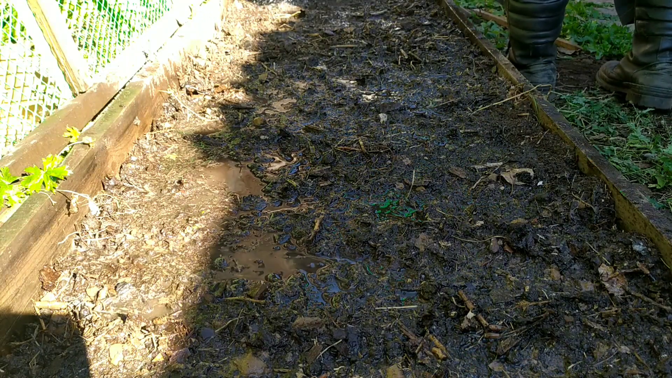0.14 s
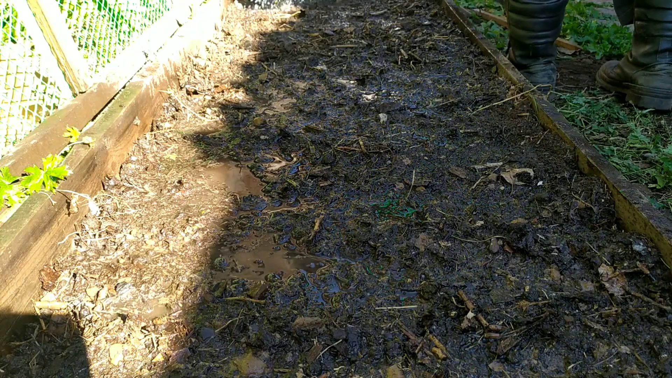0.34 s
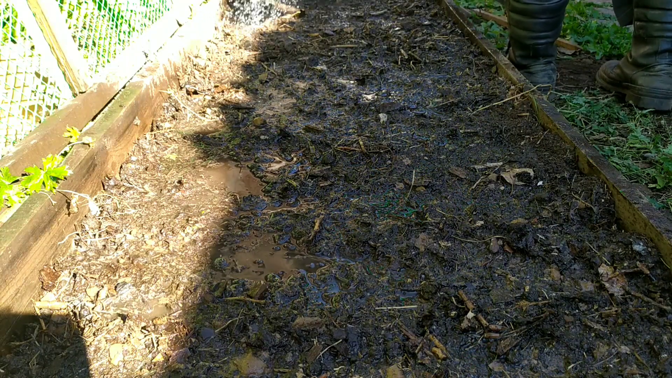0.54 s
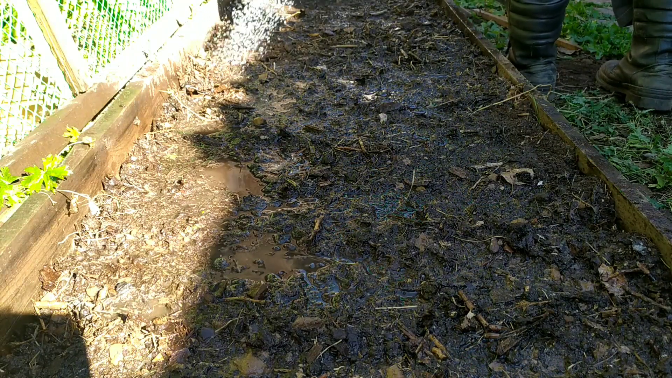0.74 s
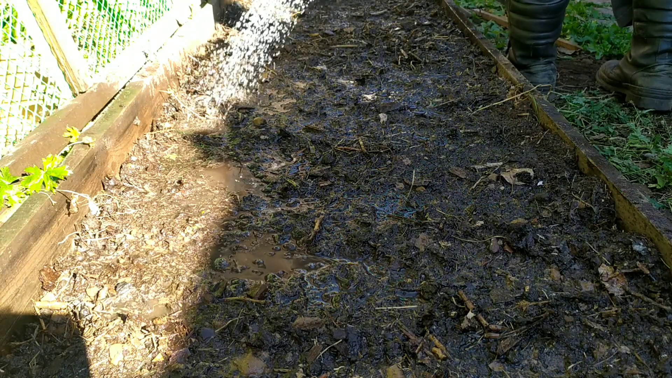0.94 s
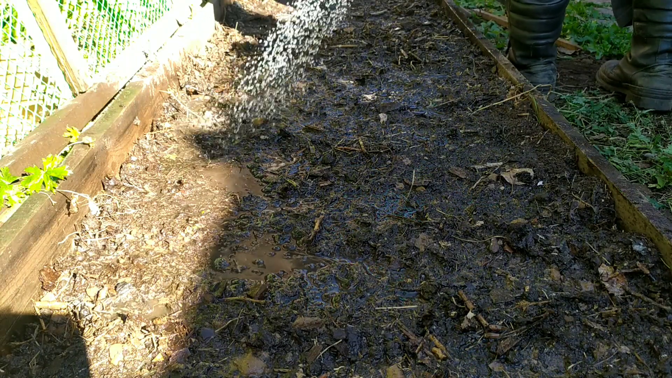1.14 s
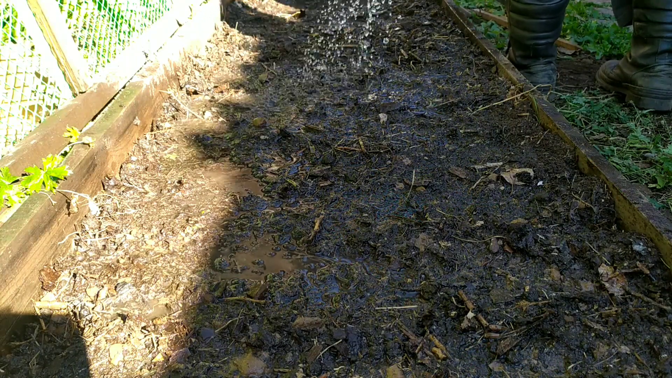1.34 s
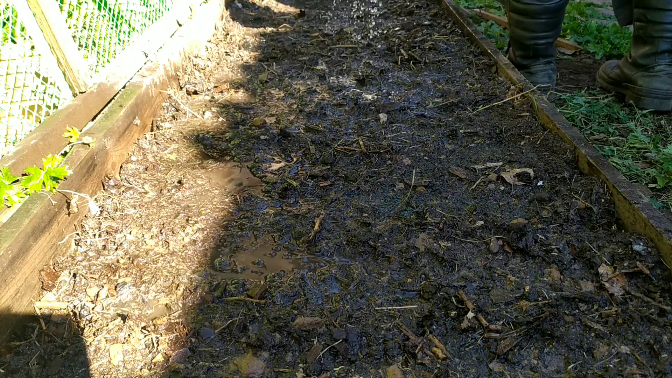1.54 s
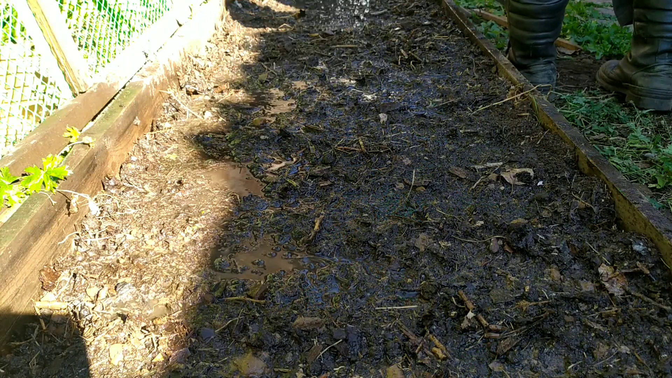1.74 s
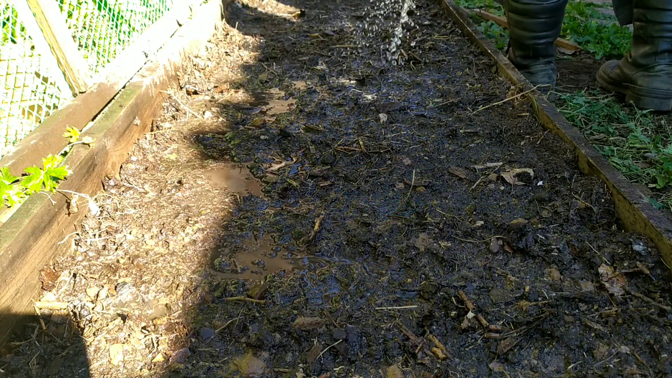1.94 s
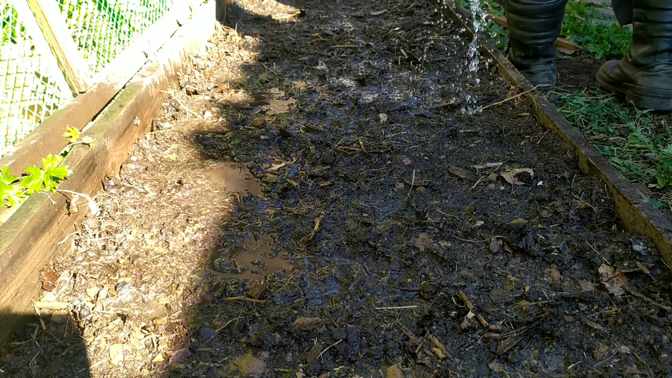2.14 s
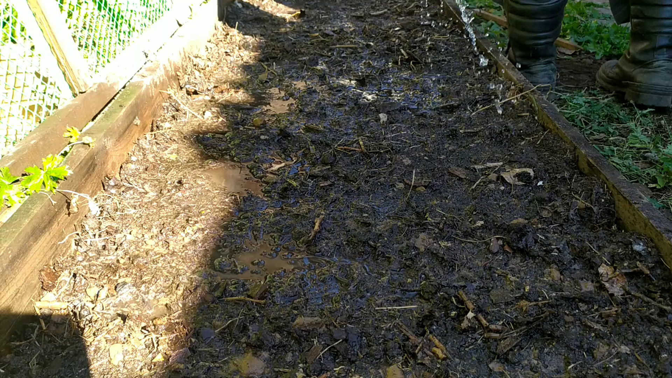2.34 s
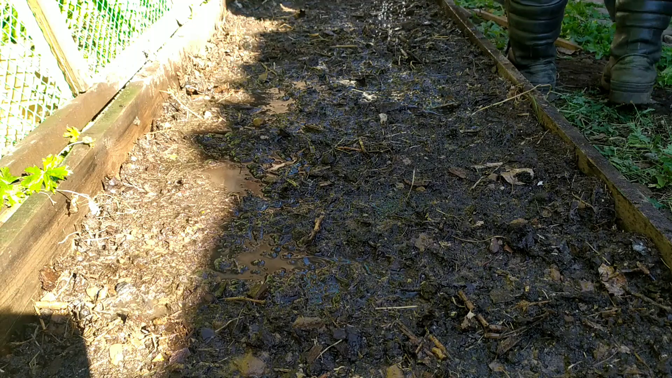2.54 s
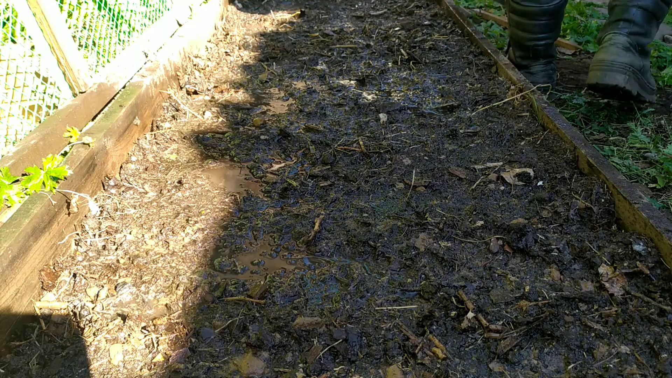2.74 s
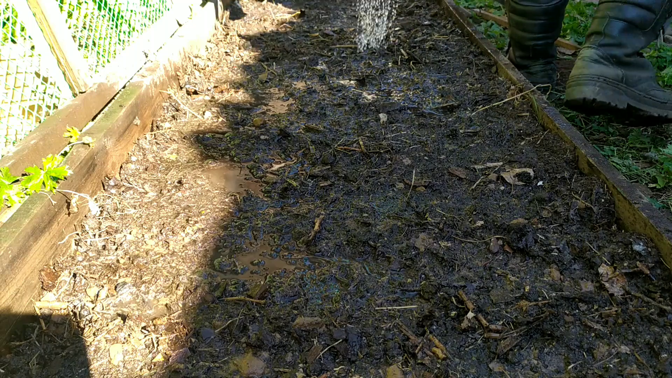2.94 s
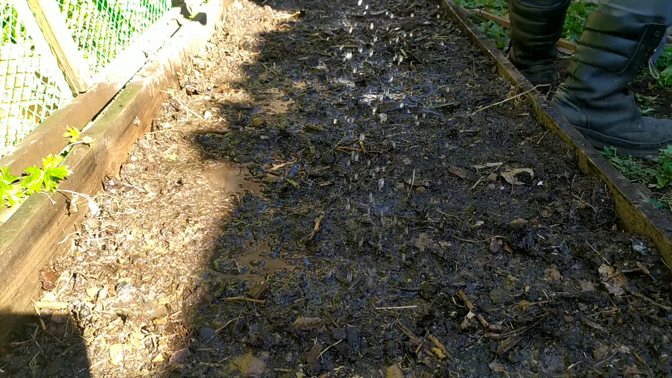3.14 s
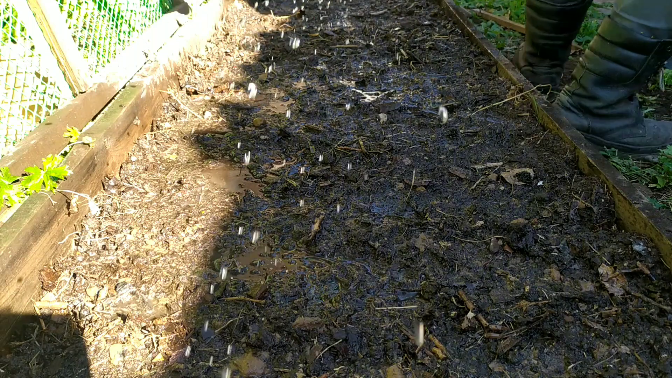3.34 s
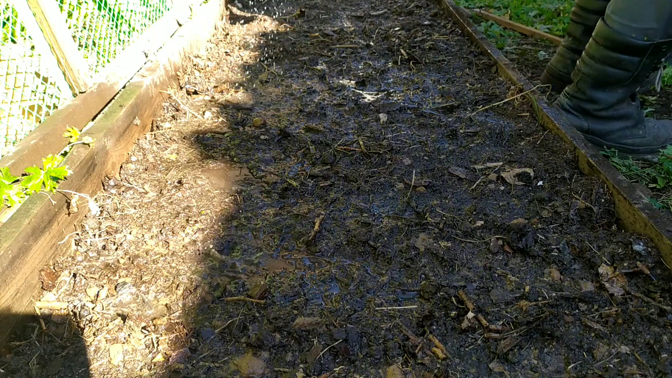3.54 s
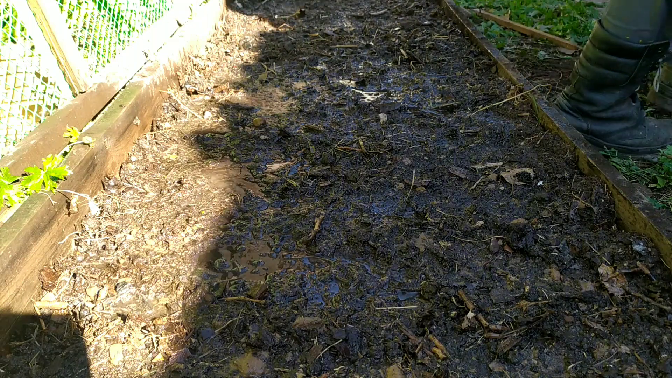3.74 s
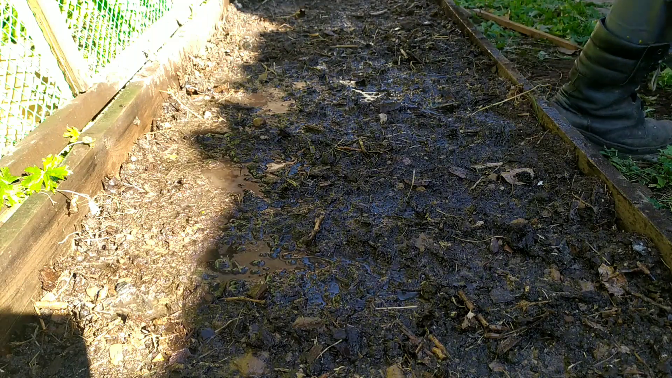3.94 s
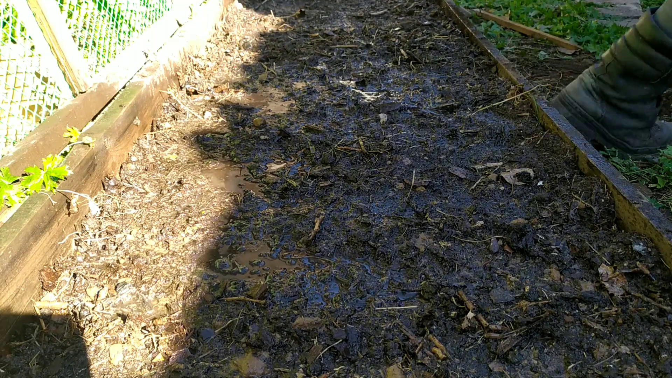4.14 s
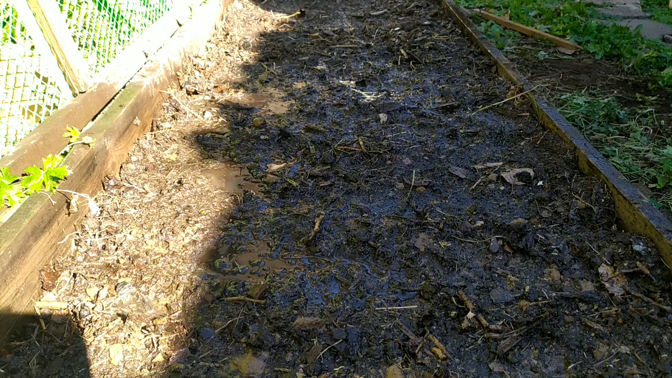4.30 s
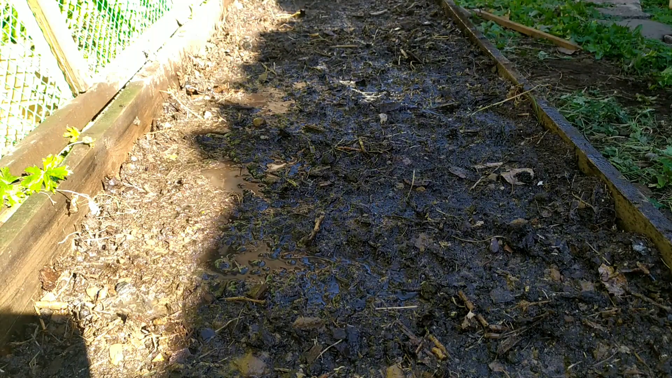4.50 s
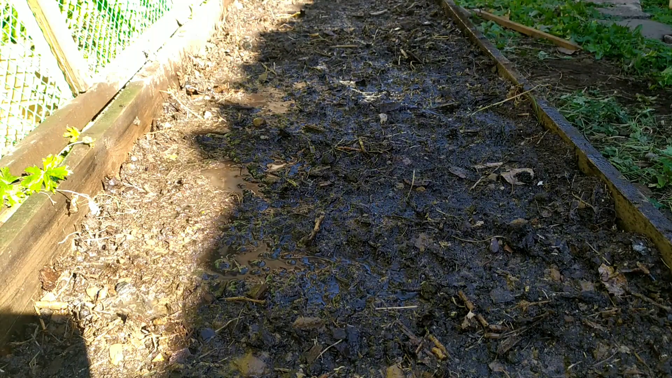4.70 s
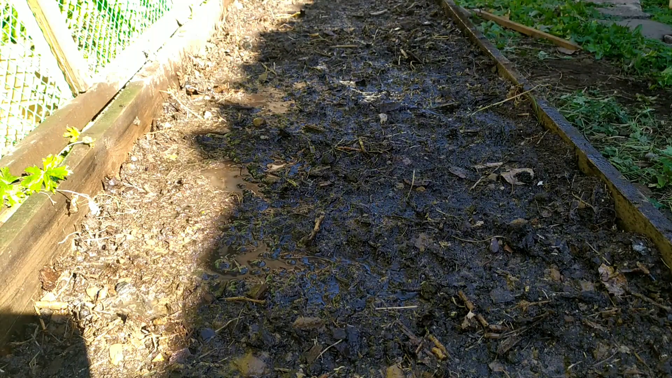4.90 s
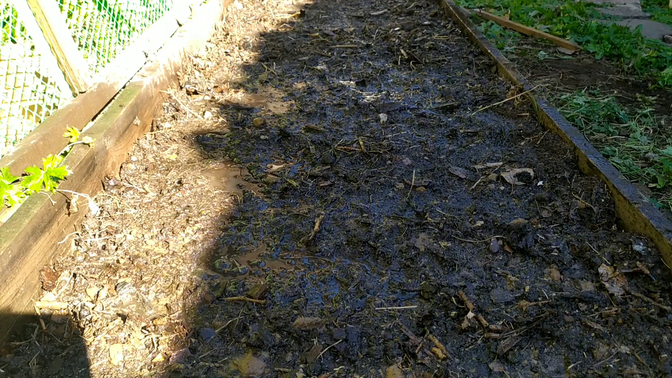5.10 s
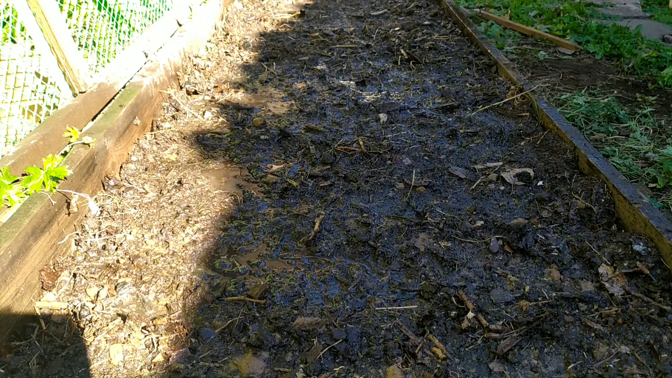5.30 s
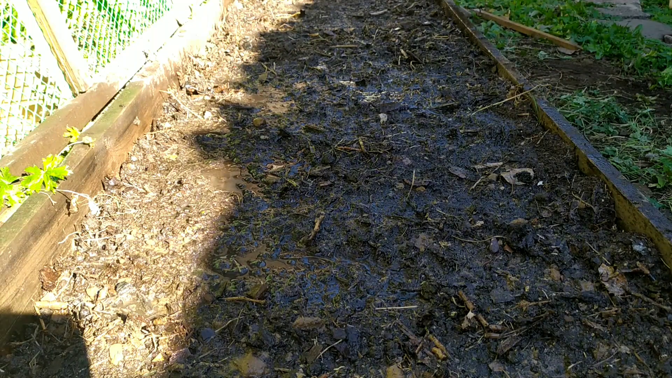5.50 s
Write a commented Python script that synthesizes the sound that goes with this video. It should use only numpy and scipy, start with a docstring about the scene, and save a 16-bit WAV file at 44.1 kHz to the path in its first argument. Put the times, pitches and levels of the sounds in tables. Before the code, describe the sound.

Fine water spray hisses and ticks over mud and leaves, stops with a small gurgle, then grass crunches and a hollow can knocks.

```python
"""A watering can sprinkles wet garden soil: damped grains make the hiss and patter of fine drops.
Fat drops tick on dead leaves, slap on mud or plip into puddles, bubbles whose pitch climbs.
The pour thins to a dribble as boots start to brush the grass, in bursts of crackle; a low hum wavers.
A last shake, and the spout gurgles on ringing modes. Boots rustle off, over a plank for a moment, and
the hollow can knocks on its own modes as it is put down. Quiet air and far-off whistles lie behind."""
import sys
import numpy as np
from scipy import signal
from scipy.fft import rfft, irfft
from scipy.io import wavfile
from scipy.ndimage import uniform_filter1d, map_coordinates

SR = 44100
rng = np.random.default_rng(int(sys.argv[2]) if len(sys.argv) > 2 else 0)


def wav_record(signal):
    """Record a signal, one row per channel, as 16-bit PCM in the file named by sys.argv[1]."""
    frames = np.transpose(np.atleast_2d(signal))
    bounded = np.clip(frames, -1, 1)
    # unit amplitude maps onto the largest positive 16-bit level
    quanta = np.round(bounded * 32767).astype(np.int16)
    wavfile.write(sys.argv[1], SR, quanta)


N = 249606
T = np.arange(N) / SR
HZ = np.fft.rfftfreq(N, 1 / SR)
REFERENCE_FLOW_DB = -40  # the strong flow at which the water layers' levels are set

# The pour, two full sweeps, a dribble and a last shake: start_s, flow_db, brightness_db_per_octave
POUR = [(0, -47, 6), (.23, -39, 2.5), (.36, -39.5, 2.5), (.44, -42.5, 2), (.56, -43, 6.5), (.69, -45.5, 4),
        (0.785, -51, 7), (0.9, -42.5, 3), (1.08, -41, 7), (1.3, -41, 2), (1.44, -45, 4.5),
        (1.66, -54.5, 1.5), (1.881, -49, 1.5), (2.032, -46.5, -5), (2.25, -54, 4.5), (2.57, -54.5, 0.5),
        (2.95, -56.5, 4.5), (3.037, -44, 3.5), (3.14, -52.5, 7.5), (3.35, -50, 7.5), (3.55, -49.5, 3),
        (3.61, -59.5, 1)]
# Spectrum of fine drops, also lent to springing stems: frequency_hz, level_db
HISS = [(1500, -36), (2500, -8.5), (3600, -5.5), (5200, -4.5), (7200, -2.5), (10000, -7), (13000, -9),
        (16000, -14)]


def amp(db):
    """Decibels to gain."""
    return 10 ** (np.asarray(db) / 20)


def unit(x):
    """Scales to rms 1."""
    return x / np.sqrt(np.mean(x ** 2) + 1e-20)


def read(points, hz):
    """Reads a spectrum on a log-frequency axis."""
    f, value = np.transpose(points)
    return np.interp(np.log(hz + 1), np.log(f + 1), value)


def colour(x, points):
    """Gives x a spectrum that falls away below its lowest point; rms 1."""
    low_cut = 1 / np.sqrt(1 + (points[0][0] / 2 / (HZ + 1)) ** 4)
    return unit(irfft(rfft(x) * amp(read(points, HZ)) * low_cut, N))


def add(mix, s, sound):
    """Adds a sound into the mix at time s."""
    part = mix[..., max(round(s * SR), 0):][..., :sound.shape[-1]]
    part += sound[..., :part.shape[-1]]


def held(start, end, fade_s):
    """Gain that fades in from start, holds, and fades out by end."""
    return np.clip(np.minimum(T - start, end - T) / fade_s, 0, 1)


def follow(rows, axis=1):
    """One column of a control curve, at every sample."""
    rows = np.array(rows)
    return np.interp(T, rows[:, 0], rows[:, axis])


def flutter(depth_db, per_s):
    """Random quick swings of gain."""
    knots = np.arange(0, T[-1] + 1, 1 / per_s)
    swings = rng.standard_normal(len(knots))
    return amp(depth_db * np.interp(T, knots, swings))


def pair(x, lead):
    """One sound at two microphones, the left one ahead by lead samples."""
    return np.array([map_coordinates(x, [np.arange(N) + side * lead], order=3) for side in (.5, -.5)])


def diffuse():
    """Noise from all around, its likeness at the two microphones strongest in the bass."""
    # Likeness of the two sides: frequency_hz, correlation (0 to 1)
    likeness = [(30, 0.63), (250, 0.77), (600, 0.71), (1200, 0.15), (3000, 0), (16000, 0.02)]
    a, b = rfft(rng.standard_normal((2, N)))
    same = np.clip(read(likeness, HZ), -1, 1)
    return irfft(np.array([a, same * a + np.sqrt(1 - same ** 2) * b]), N)


def band_noise(hz, ratio, size=4000):
    """Noise around hz for both sides, with gentle skirts."""
    band = signal.butter(2, [hz / ratio, min(hz * ratio, SR * .45)], "band", fs=SR, output="sos")
    return unit(signal.sosfilt(band, rng.standard_normal((2, size))))


def grains(per_s, spread_db, cycles, count=24):
    """A shower of tiny damped rings of many pitches and uneven size, levelled across pitch; rms 1."""
    t, out = np.arange(400) / SR, np.zeros(N)
    for hz in np.geomspace(600, 16000, count):
        chance = rng.random(N)
        size = np.minimum(rng.standard_exponential(N), 4)
        # high rings are shorter, so they come more often
        at = np.flatnonzero(chance < per_s * np.sqrt(hz / 5000) / count / SR)
        train = np.zeros(N)
        train[at] = amp(spread_db * size[at]) * (-1) ** at
        ring = np.sin(2 * np.pi * hz * t) * np.exp(-hz * t / cycles)
        out += np.sqrt(hz) * unit(signal.oaconvolve(train, ring)[:N])
    return unit(out)


def scatter(x, near_db, far_db, count=9):
    """Clods and boards smear each sound; every spot, and each side, has other reflections."""
    near_s, far_s = .0025, .02  # decay of the reflections
    t, out = np.arange(3500) / SR, x.copy()
    spot = rng.integers(0, count, N // 64 + 1)[np.arange(N) // 64]
    for k in range(count):
        decays = np.exp(-t / np.array([near_s, far_s])[:, None, None])
        near, far = rng.standard_normal((2, 2, len(t))) * decays
        taps = (amp(near_db) * unit(near) + amp(far_db) * unit(far)) / np.sqrt(len(t))
        here = uniform_filter1d((spot == k) * 1., size=32)
        out += signal.oaconvolve(x * here, taps, axes=1)[:, :N]
    return out


def wander(x, patchy_db, tilt=np.zeros(N)):
    """The colour shifts in brief patches, and leans by tilt dB per octave around 7 kHz."""
    hz, t, z = signal.stft(x, SR, nperseg=1024, noverlap=768)
    patches = uniform_filter1d(rng.standard_normal(z.shape[1:]), size=6, axis=0)  # across pitch
    patches = unit(uniform_filter1d(patches, size=8, axis=1))  # across time
    lean = np.log2(np.maximum(hz, 1000) / 7000)[:, None] * np.interp(t, T, tilt)
    shifted = z * unit(amp(patchy_db * patches)) * amp(lean)
    return signal.istft(shifted, SR, nperseg=1024, noverlap=768)[1][:, :N]


def knocks(rows, modes, contact_s, clatter_db):
    """Each blow rings the body's modes, with a short dull clatter around them."""
    out, t = np.zeros(N), T[:SR // 2]
    dull = signal.butter(2, [120, 600], "band", fs=SR, output="sos")
    for s, db, pitch, ring, dull_db in rows:
        body = np.zeros(len(t))
        for hz, mode_db, t60 in modes:
            level_db = mode_db - dull_db * np.log2(hz / 250) - 60 * t / (t60 * ring)
            body += amp(level_db) * np.sin(2 * np.pi * hz * pitch * t)
        clatter = unit(signal.sosfilt(dull, rng.standard_normal(len(t))))
        clatter *= amp(clatter_db) * np.exp(-t / (.035 * ring))
        add(out, s, amp(db) * (body + clatter) * (1 - np.exp(-t / contact_s)))
    return out


def thuds(rows):
    """Soft low pushes that swell and die away over a moment."""
    out, t = np.zeros(N), T[:SR // 3]
    for s, db, hz, decay in rows:
        u = t / decay
        add(out, s, amp(db) * u * np.exp(1 - u) * np.sin(2 * np.pi * hz * t))
    return out


def garden_air():
    """Quiet outdoor air: diffuse noise, heaviest in the bass."""
    # Spectrum of the air: frequency_hz, level_db
    air = [(30, 2), (55, 10), (100, 3.5), (170, -7), (260, -7), (450, -16), (800, -15.5), (2000, -19),
           (6000, -21), (16000, -19.5)]
    return amp(-57) * colour(diffuse(), air)


def water_flow():
    """Gain of the pour; it stops soon after the last shake."""
    return amp(follow(POUR)) * held(-1, POUR[-1][0] + .1, fade_s=.1)


def spray():
    """Strong flow is a dense hiss, weak flow separate drops; wet ground splashes, drier ground patters."""
    # Where the spray lands: start_s, left_lead_samples, wetness_db (more splash, less dull patter)
    aim = [(0, 6.5, 1), (.35, -1.5, 1.5), (1.05, -5, 0), (1.7, 3, 2.5), (2.25, 3, -2.5), (2.8, 2.5, 7),
           (3.15, 1, -6.5), (3.6, 3, -2.5)]
    # Spectrum of splashes on wet ground: frequency_hz, level_db
    splash = [(350, 11.5), (700, 9), (1300, 7.5), (2100, 11), (3200, -18), (6000, 1.5)]
    # Spectrum of dull patter on soil: frequency_hz, level_db
    soil_patter = [(70, -3.5), (120, 6), (160, 4.5), (220, -0.5), (320, 0), (500, -7), (900, -6.5),
                   (2000, -15)]
    full_per_s = 7000  # nominal grain rate at the strongest flow
    flow, brightness = water_flow(), follow(POUR, axis=2)
    lead, wetness = follow(aim), follow(aim, axis=2)

    # the exponents are dB gained per dB of flow
    relative_flow = flow / amp(REFERENCE_FLOW_DB)
    puddles = amp(-58.5 + wetness) * relative_flow ** .69
    soil = amp(-52.5 - wetness) * relative_flow ** .99
    share = np.clip(flow / flow.max(), .05, 1) ** 1.2
    clumps = flutter(depth_db=.6, per_s=260)  # the streams break into bunches of drops

    fine = grains(full_per_s * share, spread_db=3.1, cycles=1.2) / np.sqrt(share)
    fine = colour(scatter(pair(fine, lead), near_db=-2, far_db=-1), HISS)
    fine = wander(fine, patchy_db=2.6, tilt=brightness)  # the colour shifts in brief patches
    coarse = grains(400, spread_db=2.2, cycles=.8)  # larger drops prick through the hiss
    coarse = colour(scatter(pair(coarse, lead), near_db=-7, far_db=-12), HISS)
    hiss = fine + amp(-11) * coarse * share ** -.1

    wet = grains(full_per_s * share, spread_db=3.1, cycles=2.2) / np.sqrt(share)
    wet = colour(scatter(pair(wet, lead), near_db=-9.5, far_db=-4.5), splash)
    patter = colour(diffuse(), soil_patter)  # the soil takes each impact as a dull push
    return clumps * (flow * hiss + puddles * wet + soil * patter)


def tick(hz):
    """A fat drop on a leaf: a bright crack, a snap of a cycle or two and a spatter of droplets."""
    t = T[:4000]
    snap = np.cos(2 * np.pi * hz * t) * np.exp(-t * hz / 2.2)  # decays over 2.2 cycles
    crack = amp(-9) * np.exp(-t / .0006) * band_noise(10000, ratio=1.8)
    spatter = amp(-13) * np.exp(-t / .002) + amp(-35) * np.exp(-t / .015)  # droplets near and far
    landing = 1 - np.exp(-t / .00004)
    hit = landing * (snap + crack + spatter * band_noise(hz, ratio=1.24))
    no_bass = signal.butter(2, hz / 2.5, "high", fs=SR, output="sos")  # a leaf gives off no bass
    return signal.sosfilt(no_bass, hit)


def stray_drops(count=420):
    """Lesser fat drops fall at random, to either side, for as long as the water runs."""
    out = np.zeros((2, N))
    strength = (water_flow() / amp(REFERENCE_FLOW_DB)) ** .5
    times = np.cumsum(rng.standard_exponential(count)) / 45  # mean drops per second
    for s, (size, octave, side) in zip(times, 2 * rng.random((count, 3)) - 1):
        db = -44 + 5 * size + 3 * np.array([[1], [-1]]) * side
        pitch_hz = 8040 * 2 ** (.5 * octave)
        add(out, s, np.interp(s, T, strength) * amp(db) * tick(pitch_hz))
    return out


def drops():
    """Fat drops tick on leaves, slap on mud or trap a bubble whose pitch climbs by up to an octave."""
    # Loudest fat drops on leaves and crumbs: start_s, level_db (before a small lift), pitch_hz
    tick_rows = [(.2195, -28, 9000), (.601, -36.5, 13600), (0.68, -31, 13400), (0.8175, -34, 10000),
                 (.8845, -37, 10800), (1.0004, -23, 7500), (1.0192, -23, 9400), (1.11, -23.5, 7140),
                 (1.2702, -25.5, 5000), (1.3165, -26, 8500), (1.3296, -18, 9800), (1.353, -32, 6800),
                 (1.409, -25, 7340), (1.4312, -21, 9400), (1.478, -24.5, 6600), (1.5005, -29, 7000),
                 (1.5685, -32, 4800), (1.7912, -32, 10300), (1.845, -33, 10000), (1.862, -29, 7650),
                 (2.0165, -27.5, 7200), (2.025, -32, 5550), (2.162, -32, 11300), (2.205, -34, 9100),
                 (2.2713, -19.5, 9250), (2.322, -26, 7500), (2.336, -31.5, 8350), (2.3541, -35.5, 10700),
                 (2.412, -36, 8900), (2.5007, -33, 6900), (2.568, -42, 7150), (2.639, -42.5, 8500),
                 (2.9035, -28.5, 8800), (2.9133, -27, 11400), (3.003, -31, 6900), (3.0236, -30, 10300),
                 (3.074, -28, 7560), (3.1768, -26, 10000), (3.179, -21.5, 6200), (3.213, -27, 5240),
                 (3.2221, -23, 7500), (3.2464, -28, 7340), (3.2504, -23, 11000), (3.265, -28, 9000),
                 (3.275, -23.5, 9500), (3.3218, -22.5, 6200), (3.3576, -31, 10700), (3.362, -20.5, 12500),
                 (3.3944, -31, 11000), (3.446, -32, 9100), (3.4595, -19.5, 5800), (3.553, -34, 8900),
                 (3.5633, -34, 7100), (3.755, -46, 9800)]
    # Drops that trap a bubble: start_s, level_db, starting_pitch_hz, rise_octaves_per_s, decay_s
    plip_rows = [(1.4655, -36, 3700, 190, 0.0026), (1.559, -43, 1690, 200, 0.0018),
                 (1.979, -38, 3500, 50, .002), (1.9917, -39.5, 1944, 180, 0.005),
                 (2.0164, -34.5, 1690, 47, 0.0036), (2.500, -40, 1890, 44, 0.0059),
                 (2.503, -40, 2660, 170, 0.0041), (2.8355, -45.5, 3580, 14, 0.0027)]
    # Gobs of water that slap and splatter on mud: start_s, level_db, centre_hz, decay_s
    slap_rows = [(1.3836, -34, 6500, 0.0037), (1.384, -42, 3200, 0.0039), (1.4087, -39, 6000, 0.0015),
                 (1.478, -39.5, 3000, .0012), (2.0598, -40, 4670, 0.0027), (2.162, -41, 11500, .0025),
                 (2.2045, -53, 9000, .0025), (2.205, -53, 1480, .004), (2.569, -47.5, 6050, 0.0076),
                 (2.571, -61, 1500, 0.0027), (2.843, -60, 4200, .002), (2.912, -50, 6000, 0.0025),
                 (3.0223, -39, 8500, .002), (3.248, -40, 3770, 0.0017), (3.265, -50.5, 1300, 0.0063),
                 (3.367, -54, 1220, 0.0078), (3.486, -55, 2220, 0.014), (3.519, -43.5, 1400, 0.0026),
                 (3.752, -52.5, 11000, 0.0045)]
    ticks, wet, t = np.zeros((2, N)), np.zeros((2, N)), T[:4000]
    for s, db, hz in tick_rows:
        add(ticks, s, amp(db + .4) * tick(hz))
    for s, db, hz, rise, decay in plip_rows:
        pitch_hz = hz * 2 ** np.minimum(rise * t, 1)
        bubble = np.sin(2 * np.pi * np.cumsum(pitch_hz) / SR)
        impact = .3 * rng.standard_normal(len(t)) * np.exp(-t / .002)
        add(wet, s, amp(db) * (bubble + impact) * np.exp(-t / decay))
    for s, db, hz, decay in slap_rows:
        add(wet, s, amp(db) * band_noise(hz, ratio=1.33)[0] * np.exp(-t / decay))
    return ticks + scatter(wet, near_db=-12, far_db=-12)


def distant_hum():
    """A low distant hum comes and goes, wavering in pitch and level around 71 Hz."""
    turns = np.cumsum(70.8 * flutter(depth_db=.3, per_s=14)) / SR
    level = amp(-56.5) * held(1.71, 3.92, fade_s=.33) * flutter(depth_db=1.8, per_s=12)
    return level * np.sin(2 * np.pi * turns)


def grass(lead=19):
    """Stems crackle to one side: brushed, swished by strides, crunched by weight, then springing back."""
    # Boots and can swishing through grass: height_of_swish_s, level_db
    swishes = [(3.78, -55.5), (4.126, -52.5), (4.315, -52), (4.44, -51), (4.61, -57), (4.70, -54.5),
               (4.922, -52.5), (5.06, -57.5), (5.53, -49)]
    # Stems and grit crushed underfoot or under the can: start_s, level_db, attack_s, decay_s
    crunches = [(4.108, -57, 0.0022, 0.035), (4.132, -48, .0005, 0.0057), (4.1926, -35, .0004, 0.0055),
                (4.202, -40, 0.0011, 0.025), (4.302, -59, 0.0022, 0.012), (4.33, -58, .001, .008),
                (4.349, -56, 0.0022, 0.023), (4.395, -47.5, .002, 0.013), (4.664, -51, 0.00044, 0.0034),
                (4.676, -58, .0005, 0.0049), (4.712, -59, .0005, 0.0046), (5.379, -55.5, .003, 0.027),
                (5.397, -43, 0.0023, 0.017), (5.479, -33, 0.0016, 0.0084), (5.487, -44, 0.0016, 0.016),
                (5.507, -46, .001, .008), (5.528, -55, 0.0011, 0.01)]
    # Spectrum of rustling grass: frequency_hz, level_db
    rustle = [(300, 5.5), (600, -2.5), (1100, -8), (1700, -8.5), (2800, -5.5), (4000, -5.5), (7500, -5.5),
              (11000, -7), (16000, -5.5)]
    swish_rise_s, swish_fall_s = .048, .073
    walking = held(2.2, np.inf, swish_rise_s)
    force = amp(-74) * walking  # light brushing all through the walk
    for s, db in swishes:
        swell = np.exp(np.minimum((T - s) / swish_rise_s, (s - T) / swish_fall_s))
        force = np.hypot(force, amp(db) * swell)
    t = T[:SR // 3]
    for s, db, attack, decay in crunches:
        add(force, s, amp(db) * (1 - np.exp(-t / attack)) * np.exp(-t / decay))

    crackle = pair(grains(6000, spread_db=3.2, cycles=1.5), lead)
    crackle = colour(scatter(crackle, near_db=-1, far_db=-2, count=18), rustle)
    give = flutter(depth_db=1.3, per_s=240)  # stems give way in bunches
    trodden = force * give * wander(crackle, patchy_db=1.8)
    snaps = pair(grains(160, spread_db=2, cycles=3), lead)  # trodden stems springing back
    snaps = colour(scatter(snaps, near_db=2, far_db=-3), HISS)
    return trodden + amp(-66) * walking * snaps


def footfalls():
    """Soft footfalls on earth, short low pushes."""
    # Footfalls: start_s, level_db, pitch_hz, decay_s
    steps = [(3.073, -43, 106, 0.0042), (4.109, -35, 140, 0.002), (4.115, -38, 70.4, 0.007),
             (4.775, -43, 67.4, 0.018), (4.925, -44.5, 85.5, 0.01), (5.485, -40.5, 147, 0.0097),
             (5.486, -45, 277, 0.0061)]
    return thuds(steps)


def gurgle():
    """The last water gurgles down the spout, ringing its modes, and sloshes low in the can."""
    # Gurgles: start_s, level_db, pitch_factor, ring_factor, dullness_db_per_octave
    gulps = [(3.4835, -48, 1.1, 1, -0.16), (3.4905, -40, 1.05, 0.95, 0), (3.4985, -41, 1, 1, 0),
             (3.5055, -44.5, 1.04, 0.95, 0.086), (3.5195, -47, 1.3, .6, -1)]
    # Modes of the spout, before the factors: pitch_hz, level_db, t60_s
    spout = [(992, -1, 0.038), (1237, -2.5, 0.029), (1580, -1.5, 0.03), (2690, -3, 0.017)]
    # Water sloshing in the can: start_s, level_db, pitch_hz, decay_s
    sloshes = [(3.492, -55, 326, 0.0045), (3.521, -60, 400, 0.0057), (3.542, -50, 266, 0.0043),
               (3.572, -57.5, 215, 0.0095)]
    return knocks(gulps, spout, contact_s=.00095, clatter_db=-15.5) + thuds(sloshes)


def distant_whistles():
    """Thin far-off whistles glide from one pitch to another, trembling in pitch and level."""
    # Whistles: start_s, end_s, start_pitch_hz, end_pitch_hz, level_db
    whistles = [(3.66, 3.77, 4400, 4650, -69), (5.185, 5.395, 14300, 12400, -68),
                (5.6, 5.645, 1230, 1170, -63)]
    tones = np.zeros(N)
    for start, end, from_hz, to_hz, db in whistles:
        glide = np.sin(np.pi / 2 * np.clip((T - start) / (end - start), 0, 1))
        pitch = (from_hz + (to_hz - from_hz) * glide) * flutter(depth_db=.07, per_s=500)
        level = amp(db) * held(start, end, fade_s=.02) * flutter(depth_db=3.5, per_s=90)
        tones += level * np.sin(2 * np.pi * np.cumsum(pitch) / SR)
    return tones


def can_knocks():
    """Knocks of the hollow can, which rings on long low modes."""
    # Blows: start_s, level_db, pitch_factor, ring_factor, dullness_db_per_octave
    blows = [(4.193, -29, 1, 1.19, 2.5), (4.396, -41, 0.94, 1.1, 2.5), (4.481, -45, 1.85, 0.21, -4.5),
             (5.400, -48.5, 0.92, 1.1, 1.5), (5.417, -41, 0.78, 0.91, 0.5), (5.484, -38.5, 1.88, 0.36, -4),
             (5.505, -47.5, 1.36, 0.92, -1.5), (5.526, -46, 1.04, 0.65, 2), (5.553, -52, .85, 1.14, 1.5)]
    # Modes of the can, before the factors: pitch_hz, level_db, t60_s
    can = [(106.4, -7.5, 0.18), (184, 1.5, 0.076), (197.8, -5.5, 0.3), (257.7, 1, 0.25), (367, -6, 0.15),
           (492.5, -19.5, 0.17), (601, -10.5, 0.25), (833, -15.5, 0.26), (1660, -14, 0.13),
           (1750, -18, 0.22), (1890, -17, 0.14), (2215, -22, .18), (2420, -22, .16)]
    return knocks(blows, can, contact_s=.0035, clatter_db=-9)


def plank_knocks():
    """Boots on a plank, whose modes are low and mostly short."""
    # Steps: start_s, level_db, pitch_factor, ring_factor, dullness_db_per_octave
    steps = [(4.869, -33, 1, 0.98, 0.5), (4.989, -42.5, 1.12, 0.38, 5)]
    # Modes of the plank, before the factors: pitch_hz, level_db, t60_s
    plank = [(62.7, -19, 0.44), (108, 6, 0.059), (186, -3.5, 0.29), (251, -3, 0.16), (316, 8.5, 0.046),
             (372, -20, 0.02), (544, -15, 0.13)]
    return knocks(steps, plank, contact_s=.0015, clatter_db=-16)


def scene():
    """Water in front; boots and can off to one side."""
    water = spray() + stray_drops() + drops() + pair(gurgle(), lead=3.6)
    boots_and_can = pair(footfalls() + can_knocks() + plank_knocks(), lead=20.2)
    background = garden_air() + distant_hum() + distant_whistles()
    return water + grass() + boots_and_can + background


def record(dry):
    """Two slightly unlike microphones, a rumble filter and the band limit."""
    # Difference in the microphones' colour: frequency_hz, left_minus_right_db
    sides = [(700, -0.6), (2000, -0.5), (4500, -1), (8000, -1), (13000, 3.5)]
    heard = irfft(rfft(dry) * amp(np.array([[.5], [-.5]]) * read(sides, HZ)), N)
    heard = signal.sosfilt(signal.butter(3, 36, "high", fs=SR, output="sos"), heard)
    band_limit = signal.firwin(255, 16000, window=("kaiser", 9), fs=SR)
    return signal.oaconvolve(heard, band_limit[None], "same")


dry = scene()
out = record(dry)
wav_record(out)
```